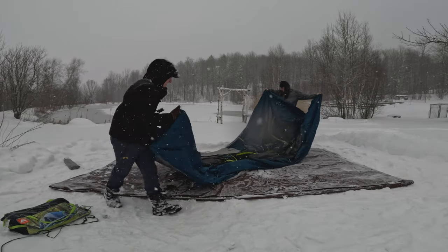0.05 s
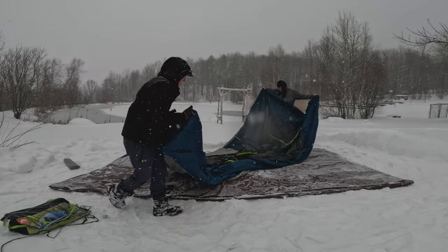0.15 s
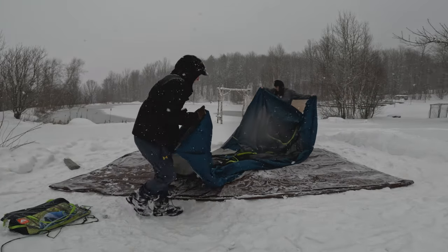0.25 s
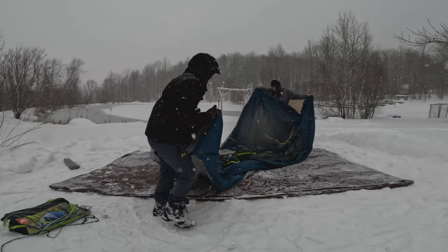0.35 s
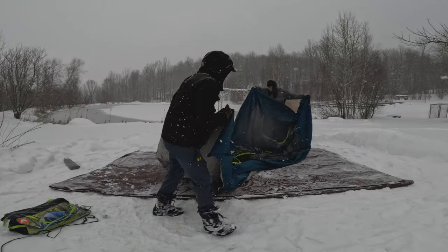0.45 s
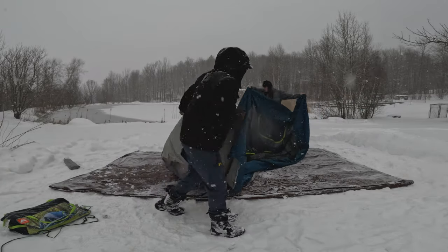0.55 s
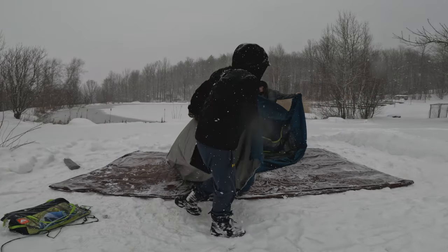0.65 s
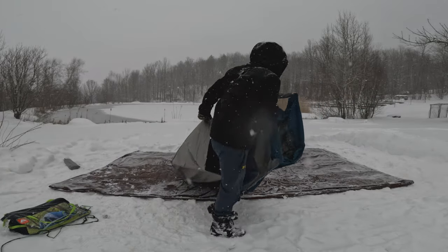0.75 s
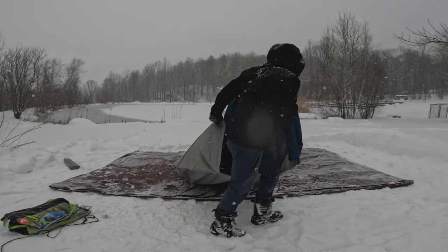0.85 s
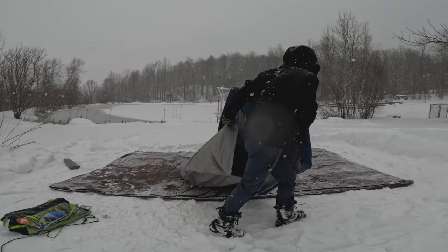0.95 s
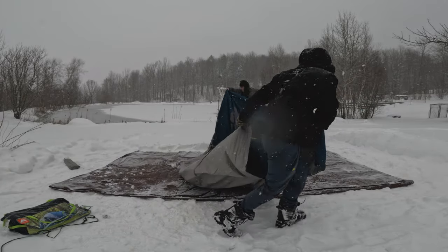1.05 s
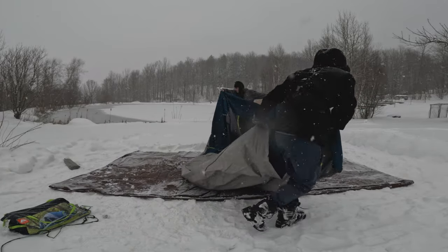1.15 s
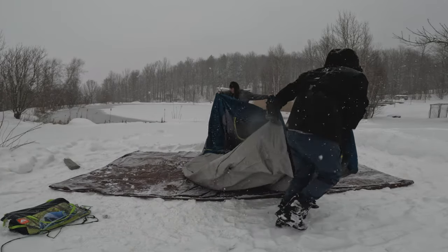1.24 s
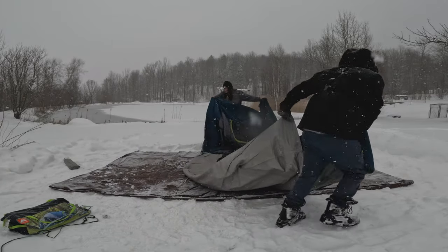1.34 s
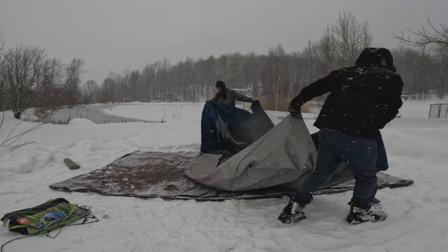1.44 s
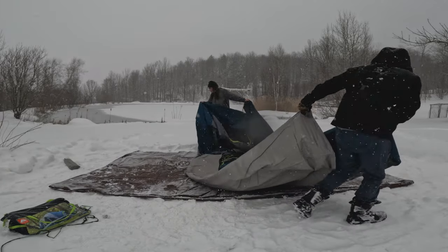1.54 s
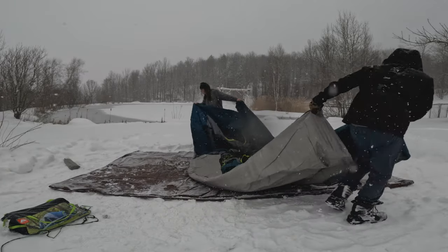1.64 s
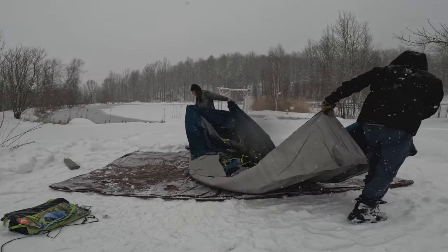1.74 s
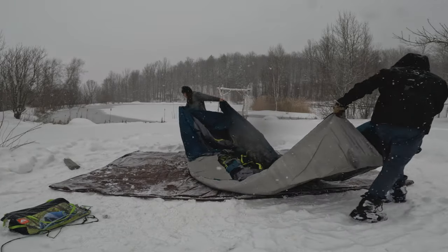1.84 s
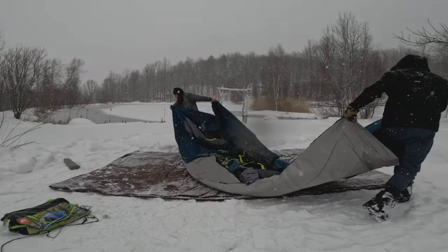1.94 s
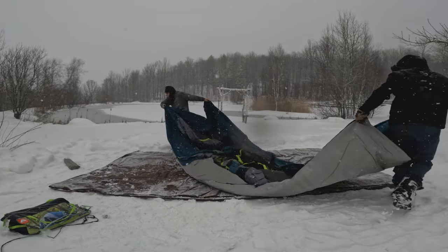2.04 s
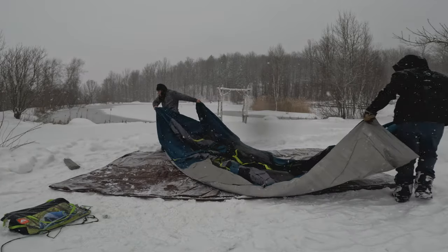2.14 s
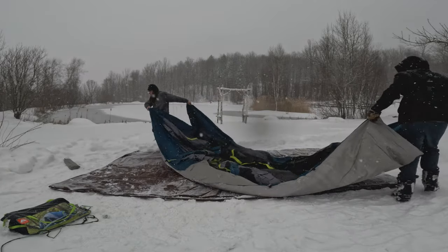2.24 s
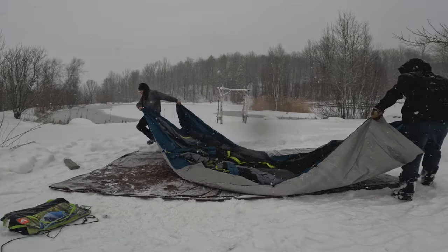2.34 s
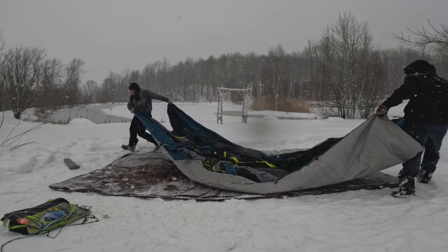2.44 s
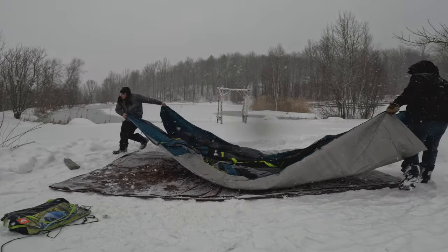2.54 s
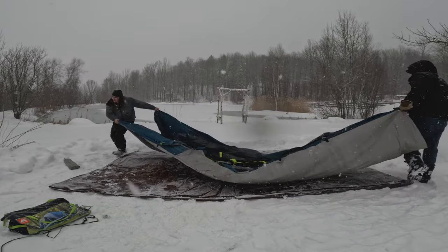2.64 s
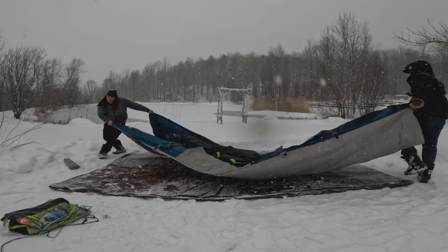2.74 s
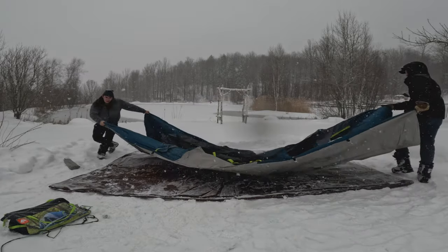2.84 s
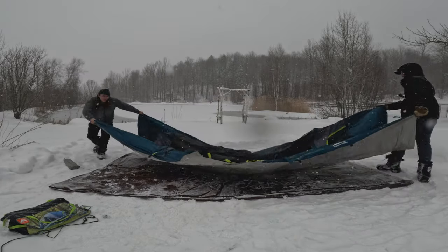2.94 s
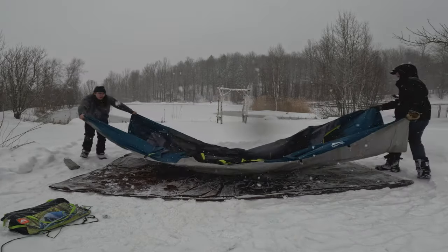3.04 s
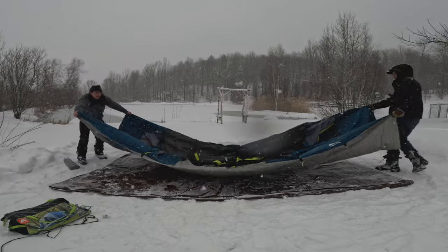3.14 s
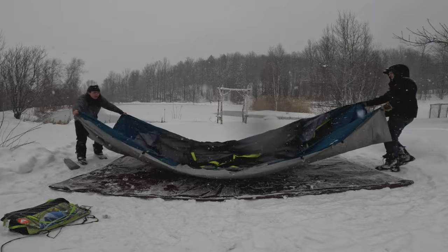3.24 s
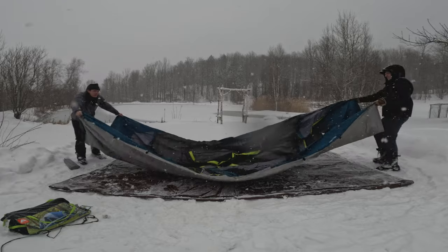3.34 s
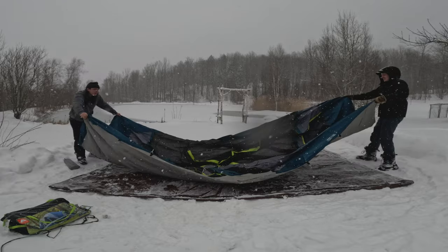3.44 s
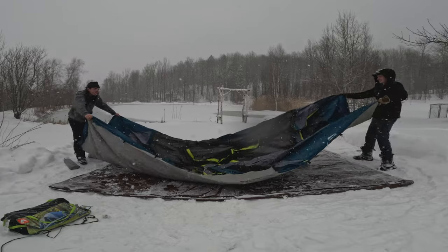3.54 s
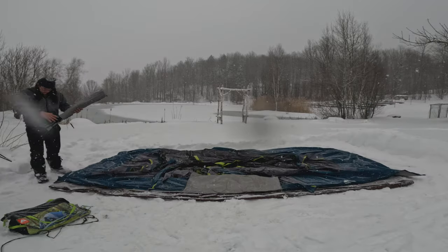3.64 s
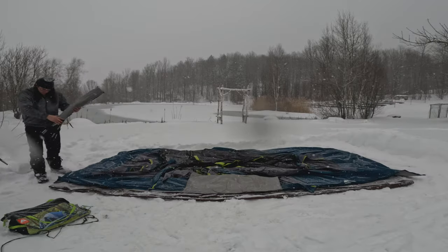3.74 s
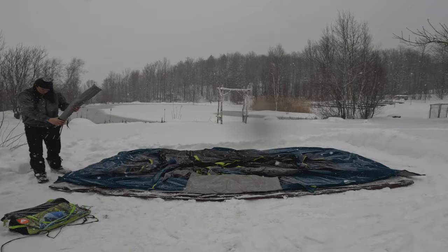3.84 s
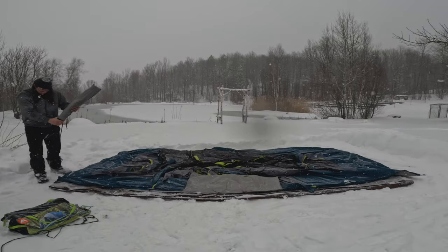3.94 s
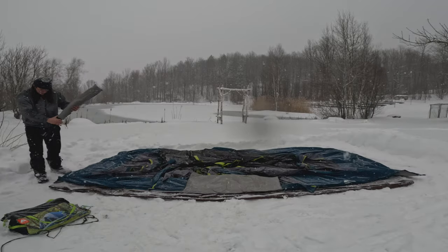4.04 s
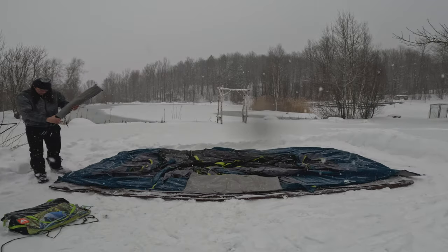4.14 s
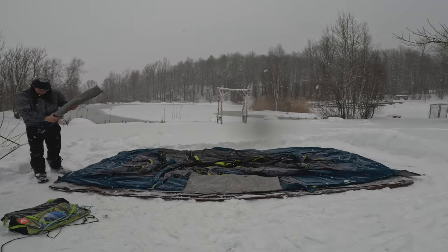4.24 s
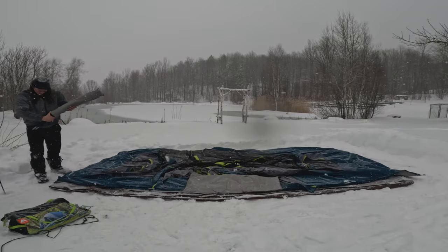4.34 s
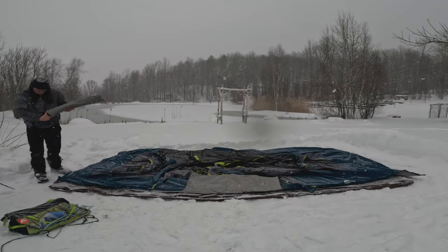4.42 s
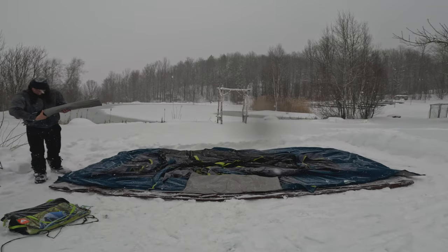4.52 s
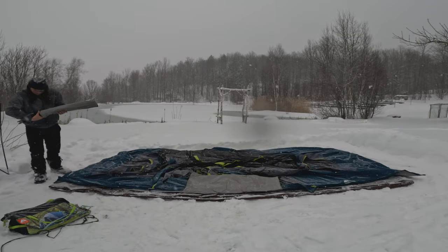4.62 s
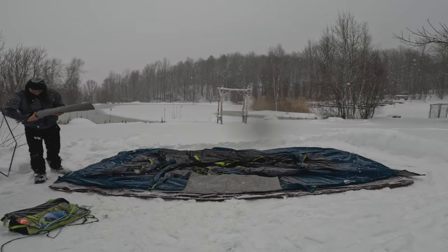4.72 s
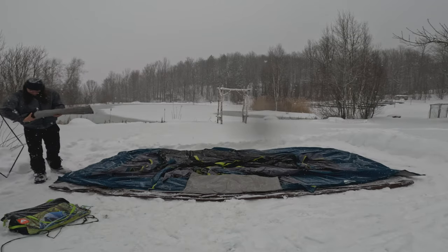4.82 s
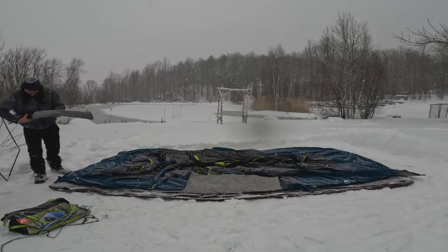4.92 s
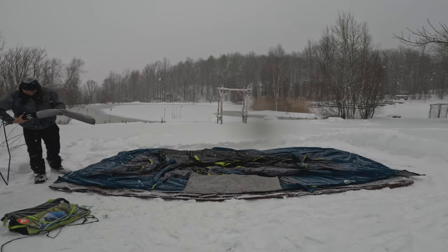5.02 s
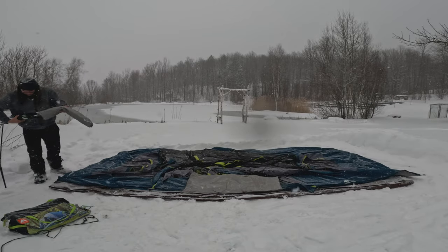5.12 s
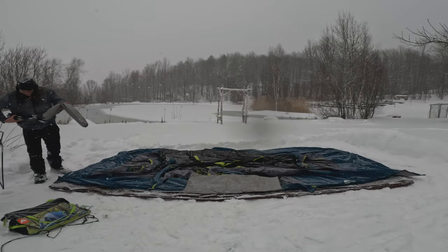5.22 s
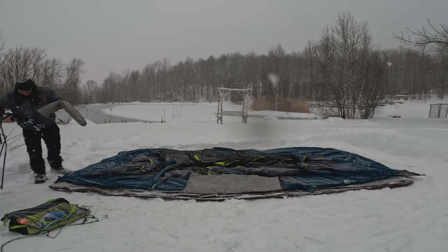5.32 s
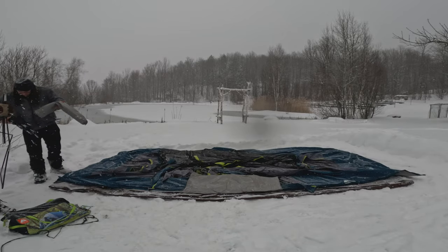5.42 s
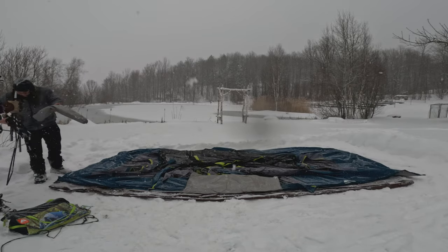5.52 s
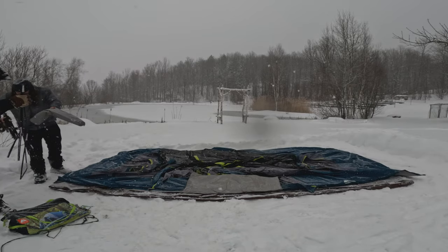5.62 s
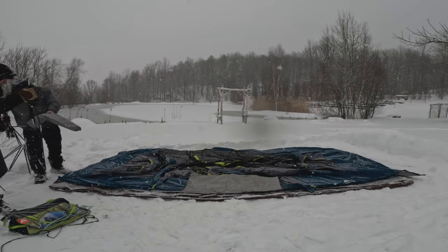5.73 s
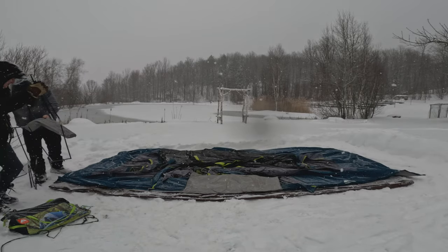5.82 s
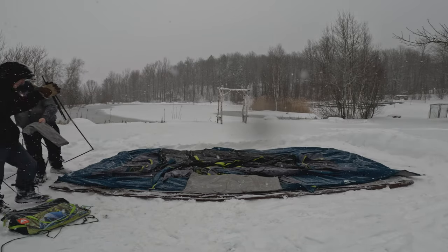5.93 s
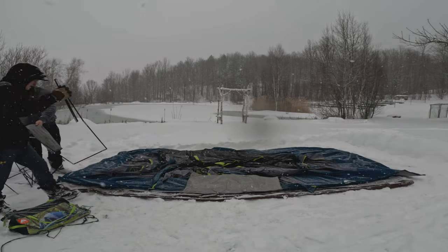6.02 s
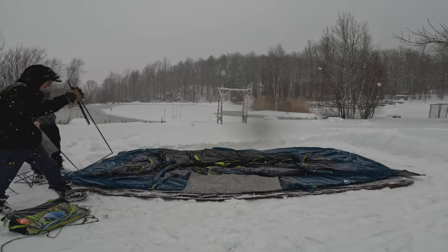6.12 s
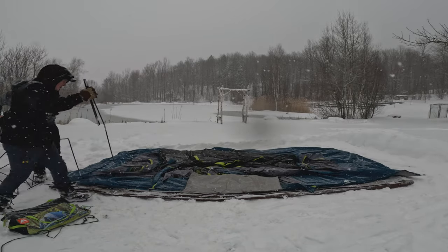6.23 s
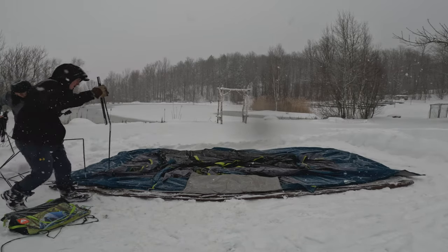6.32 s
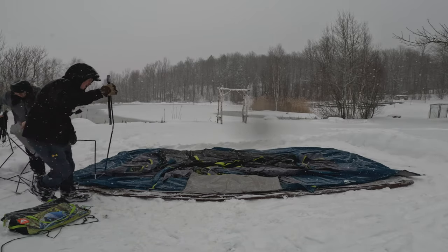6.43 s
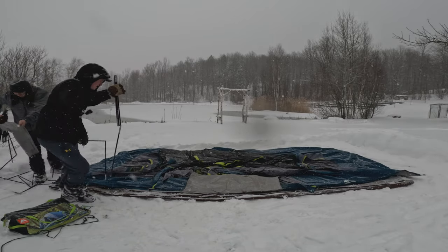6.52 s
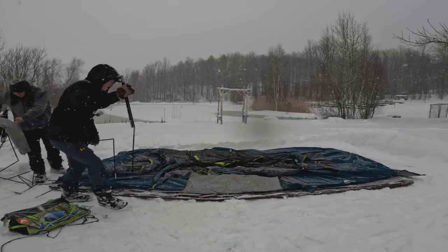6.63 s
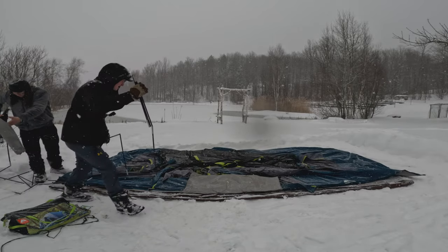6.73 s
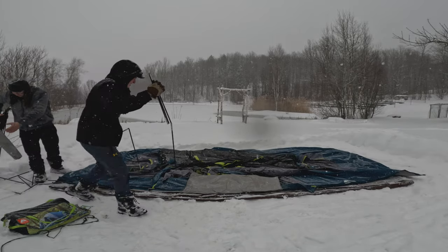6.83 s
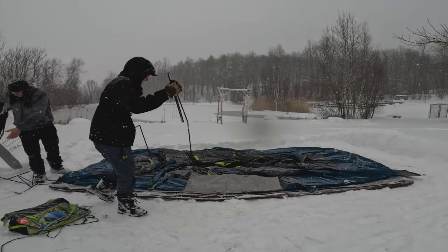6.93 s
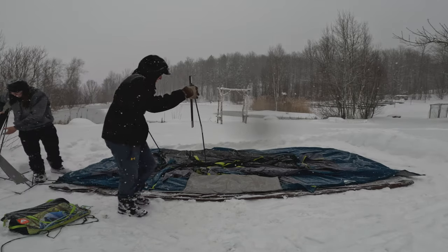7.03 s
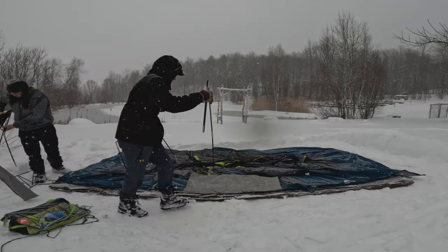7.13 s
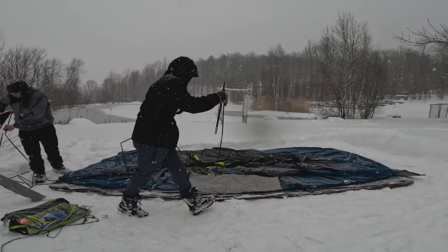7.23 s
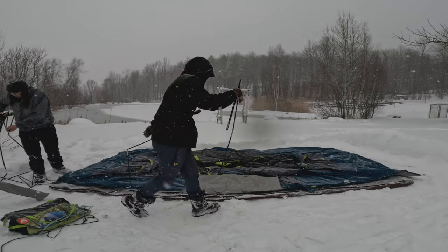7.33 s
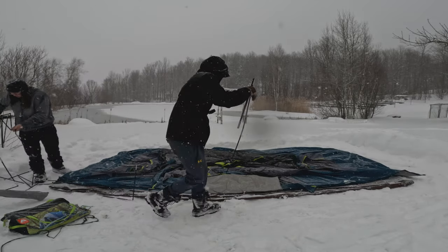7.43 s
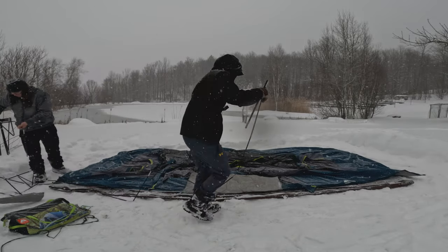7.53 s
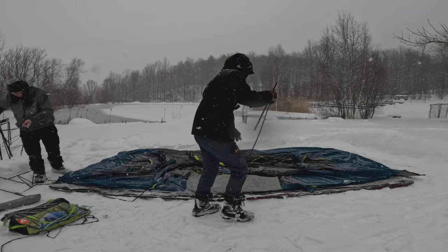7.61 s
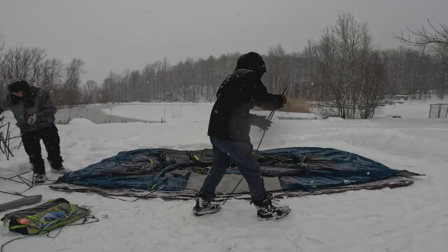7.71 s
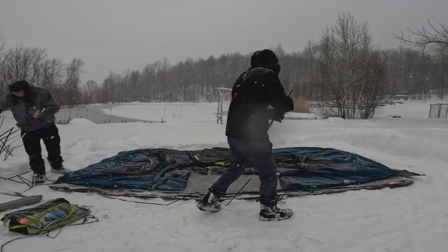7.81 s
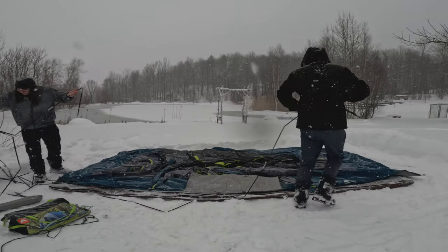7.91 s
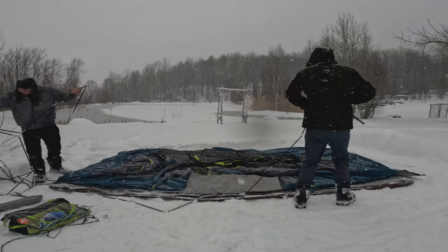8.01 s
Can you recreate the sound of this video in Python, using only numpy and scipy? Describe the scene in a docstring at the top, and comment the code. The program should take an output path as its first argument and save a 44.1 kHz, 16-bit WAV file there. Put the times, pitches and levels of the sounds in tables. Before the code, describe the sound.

Stiff nylon tent cloth hisses and rustles as it is dragged over a tarp on snow, then hollow metal poles click and clatter on the left.

```python
"""Tent and poles in the snow

Two people drag a stiff nylon tent over a tarp on snow, ahead of a small two-port camera microphone: shaped
noise hisses, rustles and drones. Then, to the left, hollow metal poles slide out of their bag, click together
and dangle: uneven impacts ring tube modes. Boots tread the snow as damped low swings with a crunch, a metal
pull jingles on a few high sines, and slow low noise is the cloth flapping and the wind rumbling on the ports."""
import sys
import numpy as np
from scipy import signal
from scipy.fft import rfft, irfft
from scipy.io import wavfile
from scipy.ndimage import uniform_filter1d

SR = 44100
rng = np.random.default_rng(int(sys.argv[2]) if len(sys.argv) > 2 else 0)


def boost(x):
    """Linear amplitude factor 10**(x/20) for a level x in decibels (scalar or array-like)."""
    u = np.asarray(x, float) / 20
    return 10 ** u


def store_pcm(level_fs):
    """Save levels as 16-bit WAV."""
    pcm = np.round(np.clip(level_fs, -1, 1) * 32767).astype(np.int16)
    wavfile.write(sys.argv[1], SR, np.atleast_2d(pcm).T)


N = 355710  # samples
MOVED = 3.62  # s, up to here the work is ahead of the microphone, from here on at its left

# cloth sliding on cloth, first the dragged tent, then the pole bag: t/s, hiss level/dB, drone level/dB
SLIDE = [
    [(0.0, -28.5, -47.5), (0.15, -29, -43.5), (0.5, -22, -46.5), (0.54, -23.5, -49), (0.87, -29.5, -47),
     (1.22, -21, -47.5), (1.34, -22, -41.5), (1.92, -21.5, -45), (2.12, -19, -39.5), (2.44, -21, -39.5),
     (2.66, -28, -44), (3.03, -29.5, -44.5), (3.18, -20.5, -39.5), (3.38, -28, -40), (3.51, -28, -48),
     (3.61, -24.5, -48)],
    [(3.63, -32, -63.5), (3.93, -31, -49), (4.12, -41.5, -64.5), (4.34, -39.5, -70.5), (4.68, -39.5, -60.5),
     (5.15, -23, -42), (5.2, -25, -39), (5.28, -29.5, -54), (5.34, -41, -70), (5.53, -39.5, -85),
     (5.7, -38.5, -52), (5.96, -40.5, -93), (6.06, -41, -79), (6.16, -40, -70), (6.37, -37, -86),
     (6.68, -44.5, -81), (6.99, -41.5, -67), (7.43, -34.5, -67), (7.55, -31, -71), (7.78, -37.5, -67),
     (8.06, -42.5, -86)],
]
RUSTLE_SHARE, RUSTLE_DB = 0.68, -2.5  # folds rustle between hiss and drone: share of the drone 0-1, offset/dB
FIZZ_SLOPE, FIZZ_DB = 0.93, -19  # the fizz follows the hiss: dB per dB, offset/dB
# the flap follows the drone: dB per dB, offset/dB for the tent, offset/dB for the lighter bag
FLAP_SLOPE, FLAP_DB, BAG_FLAP_DB = 0.92, 6, 1


def controls(t):
    """Relative levels in dB of hiss, drone, rustle, fizz and flap at times t: one slide drives them all."""
    hiss_db, drone_db = curves(SLIDE, t)
    rustle_db = RUSTLE_SHARE * drone_db + (1 - RUSTLE_SHARE) * hiss_db + RUSTLE_DB
    fizz_db = FIZZ_SLOPE * hiss_db + FIZZ_DB
    flap_db = FLAP_SLOPE * drone_db + np.where(t > MOVED, BAG_FLAP_DB, FLAP_DB)
    return hiss_db, drone_db, rustle_db, fizz_db, flap_db


# colour of the microphone cavities, on cloth and poles alike: f/Hz, level/dB
PORTS = [(180, -48), (300, -9), (640, -9.5), (950, -6), (2400, -10.5), (4600, -7.5), (5600, -4.5),
         (6450, 0.5), (7100, -7), (8300, -16.5), (10200, -18.5), (12000, -13.5), (13200, -23.5),
         (15300, -45), (16500, -71)]


def cloth(patchy_db=1.1, crackle_db=1.1, ticks_db=2.6):
    """Sliding nylon: dense friction noise with drifting patches and sudden wide-band crackle."""
    hop = 64
    frames, hz = N // hop + 5, np.fft.rfftfreq(256, 1 / SR)
    t = np.arange(frames) * hop / SR
    hiss_db, drone_db, rustle_db, fizz_db, _ = controls(t)
    port_db = read(PORTS, hz)

    # the large sheet carries the lows, small creases the highs
    deep = 1 / (1 + (hz / 950) ** 10)
    low = 1 / (1 + (hz / 2600) ** 4)
    high = 1 / (1 + (8300 / (hz + 1)) ** 16)
    drone = band_gain(port_db, hz, 350, 900) * deep
    rustle = band_gain(port_db, hz, 1050, 2400) * (1 - deep) * low
    hiss = band_gain(port_db, hz, 3500, 6720) * (1 - low) * (1 - high)
    fizz = band_gain(port_db, hz, 8000, 14000) * high
    gain = drone[:, None] * boost(drone_db)
    gain += rustle[:, None] * boost(rustle_db)
    gain += hiss[:, None] * boost(hiss_db)
    gain += fizz[:, None] * boost(fizz_db)

    patches = rng.standard_normal((len(hz), frames))
    patches = uniform_filter1d(patches, size=8, axis=0)
    patches = evened(uniform_filter1d(patches, size=30, axis=1))
    bursts = np.minimum(rng.exponential(1, frames), 4) - 1
    crackle = evened(signal.lfilter([1], [1, -.6], bursts))
    depth_db = np.where(t > MOVED, ticks_db, crackle_db)  # the stiff bag ticks more than the dragged sheet
    gain = gain * boost(patchy_db * patches + depth_db * crackle)
    gain = gain * (hz > 120)[:, None]
    spectra = gain * pair(frames, hop, hz)
    return boost(1.0) * signal.istft(spectra, nperseg=256, noverlap=192)[1][:, :N]


# loud pole clicks: t/s, peak level/dB, brightest ring f/Hz, low knock trim/dB, treble trim/dB
CLICKS = [(3.6244, -13, 6200, -27, -27), (3.6485, -17, 5890, -31, -24), (3.689, -7.5, 6300, -38, -21),
          (3.702, -14, 6560, -30, -25), (3.7194, -2, 5940, -51, -17), (3.775, -1, 6500, -38, -16),
          (3.7864, -11, 6450, -26, -16), (3.8576, -12, 6800, -29, -17), (3.8932, -16, 6070, -28, -23),
          (3.912, -10, 6000, -27, -32), (3.944, -11, 6460, -28, -15), (4.0048, -3, 6600, -34, -9),
          (4.017, -14, 6040, -31, -19), (4.0432, 0, 6560, -33, -18), (4.062, -9.5, 4980, -33, -18),
          (4.117, -12.5, 6240, -34, -26), (4.1345, -14, 5890, -29, -33), (4.3152, -17.5, 6200, -25, -25),
          (4.341, -12.5, 5950, -24, -29), (4.428, -17, 5760, -29, -29), (4.4702, -14.5, 5400, -34, -22),
          (4.5494, -8, 3600, -32, -17), (4.5744, -18, 3460, -27, -27), (4.656, -8.5, 6350, -29, -19),
          (4.7092, -21.5, 6280, -13, -32), (4.7436, -16, 5770, -17, -26), (4.7783, 0, 6100, -43, -34),
          (4.8189, -14, 7580, -38, -10), (5.1374, -3.5, 6400, -28, -22), (5.1744, -6, 6000, -26, -18),
          (5.2859, -5.5, 6500, -28, -19), (5.3026, -10.5, 5900, -16, -24), (5.3175, -11.5, 6560, -25, -22),
          (5.4222, -7.5, 5700, -40, -19.5), (5.5947, -12, 6200, -31, -18), (5.6253, -14, 5800, -32, -15),
          (5.6433, -11, 7250, -32, -25.5), (5.6478, -9, 4570, -24, -18), (5.6732, -15.5, 5600, -31, -14),
          (5.701, -15, 6250, -33, -21), (5.7688, -20, 6080, -37, -23), (5.7945, -24, 5500, -33, -13),
          (5.8202, -19.5, 6350, -31, -21), (5.8661, -5, 4900, -42, -30), (5.9614, -16, 6240, -40, -25),
          (5.9671, -10.5, 6290, -35, -29), (6.0128, -0.5, 5340, -32.5, -23), (6.0552, 0.5, 6400, -46, -21),
          (6.0624, -20, 6270, -29, -23), (6.099, -2, 4550, -36, -28), (6.1252, -3, 4890, -38, -29),
          (6.1464, -8.5, 6400, -36, -19), (6.1542, -12, 6350, -24, -20), (6.2412, -9, 6160, -35, -27),
          (6.2506, -6.5, 5500, -35, -27), (6.2664, -5, 6070, -30, -25), (6.2896, -11.5, 6500, -24, -26),
          (6.3107, -13, 5250, -30, -18), (6.3326, -1, 6800, -32, -19), (6.5523, -24, 5700, -25, -24),
          (6.9256, -2, 6400, -48, -17.5), (7.0013, -13, 4900, -28, -27), (7.0205, -12, 6370, -39, -24),
          (7.035, -24, 4960, -39, -35), (7.057, -20, 5670, -34, -19), (7.0721, -5.5, 4630, -46, -25),
          (7.0935, -1, 4280, -40, -22), (7.1076, 1, 6100, -38, -17.5), (7.128, -18, 6300, -27, -27),
          (7.205, -4.5, 5800, -34, -28), (7.3017, -8, 5700, -17.5, -26), (7.3801, -8.5, 4900, -26, -27),
          (7.3913, -6, 5250, -25, -15), (7.4078, -11, 5440, -27, -25), (7.4408, -5, 5760, -32, -25),
          (7.4724, -1, 6400, -40, -18), (7.4825, -7, 5900, -36, -19), (7.4943, 1, 6200, -43, -22),
          (7.5044, -5, 6300, -41, -24), (7.517, -9, 6270, -27, -19), (7.5333, -5, 5540, -40, -19),
          (7.5503, -11, 4400, -38, -21), (7.5894, -2.5, 5930, -43, -23), (7.6053, -7, 6500, -35, -17),
          (7.616, -6.5, 5570, -32, -20), (7.647, -17, 6460, -23, -18), (7.6647, -4, 6200, -52, -24),
          (7.6846, -32, 6350, -36, -16), (7.7116, -5.5, 6430, -26, -20), (7.7608, -12, 6400, -31, -28),
          (7.7822, -19, 6590, -28, -25), (7.8286, -18, 6060, -32, -15), (7.87, -11, 6500, -47, -28),
          (7.881, 0.5, 6400, -62, -27), (7.9174, -7.5, 6200, -46, -14), (7.9778, -13, 5960, -46, -13),
          (8.001, -9.5, 6300, -37, -19), (8.0486, -18.5, 6270, -25, -26)]
CLICK_T60_S, CLICK_T60_SPREAD = 0.016, 0.6  # typical ring of a click in s, random log spread


def clicks():
    """Pole on pole: a hard tick dies fast into a faint after-rattle."""
    out, t = np.zeros((2, N)), np.arange(4500) / SR
    attack = np.minimum(t / .0004, 1)
    rattle = boost(-12 - 60 * t / .045)
    for s, peak_db, ring_hz, *tone in CLICKS + ticks():
        t60 = CLICK_T60_S * np.exp(CLICK_T60_SPREAD * rng.standard_normal())
        ring = boost(-60 * t / max(t60, .004))
        add(out, s - .0003, boost(peak_db) * struck(attack * (ring + rattle), ring_hz, *tone))
    return out


TICKS_PER_S = 10  # faint ticks of dangling sections
TICK_DB, TICK_SPREAD_DB = 10.5, 4.5  # offset re the hiss of the bag, random spread
TICK_LOW_HZ, TICK_HIGH_HZ = 4000, 6100  # range of the brightest ring
TICK_KNOCK_DB, TICK_TREBLE_DB = -25.5, -19  # trims as for the loud clicks


def ticks():
    """Rows of faint clicks at random moments, louder while the bag is moved."""
    lasts = N / SR - MOVED
    when, size, pitch = rng.random((round(TICKS_PER_S * lasts), 3)).T
    s = MOVED + when * lasts
    peak_db = controls(s)[0] + TICK_DB - TICK_SPREAD_DB * np.log(np.maximum(size, .1))
    ring_hz = TICK_LOW_HZ + pitch * (TICK_HIGH_HZ - TICK_LOW_HZ)
    return [(*row, TICK_KNOCK_DB, TICK_TREBLE_DB) for row in zip(s, peak_db, ring_hz)]


# scrapes of tube, bag and stiff creases:
# t/s, peak level/dB, brightest ring f/Hz, hold/s, low knock trim/dB, treble trim/dB
SCRAPES = [(3.353, -14, 5200, 0.016, -11, -22), (3.69, -20, 5500, 0.023, -24, -27),
           (3.858, -20, 6000, 0.074, -26, -27), (4.011, -7.5, 5400, 0.058, -29, -6),
           (4.552, -13, 3730, 0.034, -31, -21.5), (5.923, -27, 4330, 0.041, -32, -21),
           (5.971, -15.5, 5740, 0.013, -29, -20), (6.02, -15, 4970, 0.023, -30, -17),
           (6.244, -11.5, 5600, 0.012, -35, -19), (6.284, -18, 4000, 0.038, -18, -12),
           (6.331, -3, 3660, 0.02, -31, -26), (7.021, -10.5, 4600, 0.023, -39, -27),
           (7.288, -22, 3470, 0.047, -19.5, -18), (7.475, -10, 4530, 0.064, -33.5, -21),
           (7.716, -16, 4800, 0.031, -17.5, -17), (7.835, -25, 6000, 0.046, -24, -11)]


def scrapes():
    """Sliding contact holds the tube ringing for a while, then lets it die."""
    out, t = np.zeros((2, N)), np.arange(4500) / SR
    for s, peak_db, ring_hz, lasts, *tone in SCRAPES:
        hold = np.minimum(t / .003, 1) * boost(-60 * np.maximum(t - lasts, 0) / .03)
        add(out, s, boost(peak_db) * struck(hold, ring_hz, *tone, dull_db=-11., reach=.7, grit=.3))
    return out


# modes of a pole section: f/Hz, width/Hz, level/dB before random variation
TUBE = [(1620, 45, -2), (2335, 45, 1), (2840, 50, -3), (3250, 40, 2), (3410, 40, 0), (3700, 40, 0),
        (4330, 40, 2), (4850, 50, 0), (5090, 55, -1), (5650, 55, 0), (6120, 55, -3), (6700, 55, 0),
        (7600, 60, -1), (8800, 80, -1)]


def struck(envelope, ring_hz, knock_db, treble_db, dull_db=-9., reach=.5, grit=.7):
    """Uneven impacts under an envelope ring the tube modes near ring_hz, then pass the port cavities."""
    hz = np.fft.rfftfreq(8192, 1 / SR)
    common, stray, size = rng.standard_normal((3, len(envelope)))
    impacts = envelope * np.exp(grit * uniform_filter1d(size, size=9) * 3)
    tube = boost(dull_db) + 1 / (1 + 1j * (hz - ring_hz) / 250)
    for (f, width, db), place in zip(TUBE, rng.standard_normal(len(TUBE))):  # where it is hit sets the mix
        near = np.exp(-(np.log(f / ring_hz) / reach) ** 2)
        tube = tube + boost(db + 4.5 * place) * near / (1 + 1j * (hz - f) / width)
    colour_db = read(PORTS, hz) + 20 * np.log10(abs(tube))
    # knock trims the lows, treble the top; the ring between is left alone
    trim_db = [knock_db + 13.5, knock_db + 11.5, knock_db + 27.5, 0, 0, treble_db + 20.0]
    colour_db += np.interp(hz, [300, 700, 2000, 3000, 7600, 8600], trim_db)
    response = causal(colour_db)
    spectra = [(response * rfft(noise * impacts, 8192))[:, None] for noise in (common, stray)]
    heard = irfft(ports(*spectra, hz, LEFT)[:, :, 0])[:, :5000]
    return heard / abs(heard.mean(0)).max()


# creases snapping and boots landing: t/s, relative level/dB, f/Hz, crunch re push/dB before a common lift
THUDS = [(0.139, -27, 135, -14), (0.6, -18, 121, -36), (0.856, -17.5, 148, -19), (1.352, -19.5, 81, -10.5),
         (1.418, -10, 106, -27), (1.533, -16, 99, -34), (1.793, -13, 103, -38), (2.112, -17, 83, -11),
         (2.439, -20.5, 101, -7.5), (2.528, -28, 116, -29), (2.665, -16.5, 107, -34), (3.864, -43, 153, -8),
         (4.38, -39, 174, -26), (4.842, -47, 81, -5), (5.069, -27.5, 116, -1.5), (5.519, -31, 137, -25),
         (5.546, -24, 136, -45), (5.665, -37, 119, -33), (5.733, -35, 94, -34), (5.979, -17, 117, -37),
         (6.145, -29, 81, -25), (6.243, -18, 106, -41), (6.288, -32, 97, -13), (6.64, -31, 89, -22),
         (6.875, -25.5, 152, -31), (7.205, -20, 132, -20), (7.309, -17.5, 92, -14.5),
         (7.381, -20.5, 92, -24), (7.441, -24.5, 153, -41), (7.714, -19.5, 141, -14),
         (7.827, -22.5, 81, -26)]
THUD_T60_S = 0.053


def thuds():
    """A soft low push: one damped swing and a crunch of packed snow or stiff cloth."""
    out, t = np.zeros((2, N)), np.arange(6000) / SR
    band = signal.butter(2, [250 / SR * 2, 1300 / SR * 2], "band")
    attack = np.minimum(t / 0.0038, 1)
    for s, peak_db, hz, crunch_db in THUDS:
        crunch = evened(signal.lfilter(*band, rng.standard_normal(len(t))))
        push = np.sin(2 * np.pi * hz * t) + boost(crunch_db + 2.5) * crunch
        decay = boost(peak_db + 2.5 - 60 * t / THUD_T60_S)
        add(out, s - .003, decay * attack * push * [[1.05], [.95]])
    return out


# a small metal pull jingles: t/s, relative level/dB, shaken/s
JINGLES = [(2.745, -31.5, 0.037), (3.492, -19, .018), (7.816, -36.5, .045)]
# modes of the pull: f/Hz, level/dB, t60/s
PULL = [(7890, -8, .06), (8050, -11, .05), (11600, -9, .05), (11832, 0, .07), (12165, -2, .07)]


def jingles():
    """The pull rattles for a moment; its few high modes sing, stronger at the left port."""
    out, t = np.zeros((2, N)), np.arange(5000) / SR
    ring = sum(boost(db - 60 * t / t60) * np.sin(2 * np.pi * hz * t) for hz, db, t60 in PULL)
    ring = ring * np.minimum(t / 0.0024, 1)
    for s, db, shaken in JINGLES:
        taps = (rng.random(len(t)) < 250 / SR) * (t < shaken) * 0.46  # 250 taps a second on average
        taps[0] = 1
        add(out, s, boost(db) * signal.fftconvolve(taps, ring)[None] * [[1.4], [.6]])
    return out


# colour of the flapping sheet: f/Hz, relative level/dB per Hz
FLAP = [(26, -39), (45, 2), (97, 0.5), (177, -3.5), (348, -21), (500, -33.5), (650, -32), (1100, -120)]
SETTLE_DB, SETTLE_T60_S = -16.5, 0.4  # rumble re the thud as cloth and snow settle after it


def flap(lumpy_db=3.0):
    """The lumpy low flap of the heavy sheet, swelling after each thud as cloth and snow settle."""
    t = np.arange(N) / SR
    level = boost(controls(t)[-1])[None]
    for s, peak_db, *_ in THUDS:
        add(level, s, boost(peak_db + SETTLE_DB - 60 * t[None, :SR // 2] / SETTLE_T60_S))
    lumps = uniform_filter1d(rng.standard_normal(N), size=900)
    lumps = evened(uniform_filter1d(lumps, size=900))
    return level * boost(lumpy_db * lumps) * rumble(FLAP, 60, 670)


# wind on the ports: t/s, relative level/dB
GUSTS = [(0.0, -42), (1.32, -46), (1.37, -29.5), (2.36, -40), (2.53, -49), (2.99, -55), (3.16, -33),
         (3.86, -40), (3.97, -22), (4.02, -35), (5.0, -42.5), (5.14, -32.5), (6.13, -39.5), (6.15, -33.5),
         (6.69, -31), (6.98, -35.5), (7.14, -29), (8.06, -39)]
# colour of the wind: f/Hz, relative level/dB per Hz
WIND = [(8, 1.5), (18, 2.5), (30, 0), (45, -3.5), (60, -35.5), (90, -57), (300, -38), (500, -87)]


def wind():
    """Slow swings of wind pressure on the microphone ports."""
    level = boost(curves([GUSTS], np.arange(N) / SR)[0])
    return level * rumble(WIND, 20, 55)


def rumble(colour, lo_hz, hi_hz):
    """Low noise of a given colour at both ports, from long overlapping random spectra."""
    frames, hz = N // 1024 + 5, np.fft.rfftfreq(4096, 1 / SR)
    gain = band_gain(read(colour, hz), hz, lo_hz, hi_hz)
    spectra = gain[:, None] * pair(frames, 1024, hz)
    return boost(1.5) * signal.istft(spectra, nperseg=4096, noverlap=3072)[1][:, :N]


# the port pair for a source ahead and for one on the left:
# f/Hz, likeness 0-1, left minus right level/dB, phase by which the left leads/rad
AHEAD = [(60, .98, 1, -.1), (400, .95, 0, -.4), (1000, .96, -1, -.5), (3100, .87, 0, -.7),
         (5200, .93, 0, -.4), (6400, .99, 0, -.1), (7200, .89, 4, 0), (8600, .5, 12, -.4),
         (9600, .52, 10, -1.3), (11500, .58, 8, -.9), (12700, .2, 8, -2.5), (14500, .3, 1, -4)]
LEFT = [(60, 0.97, 0.36, -0.38), (393, 0.68, 0.53, -0.28), (960, 0.92, 2.1, -0.38),
        (3080, 0.79, 5.7, -0.55), (6560, 1, 0.51, 0.32), (7800, 1, 10.5, 1.7), (8700, .6, 17, 0.83),
        (10000, .5, 12, 0.84), (12000, 0.29, 13.6, 0.88), (13400, 0.25, 11, -0.53), (14500, .4, 5, 0)]


def pair(frames, hop, hz):
    """Random short-time spectra at both ports, ahead until MOVED and then on the left."""
    a, b, c, d = rng.standard_normal((frames, len(hz), 4)).T
    common, stray = a + 1j * b, c + 1j * d
    moved = np.arange(frames) * hop / SR > MOVED
    return np.where(moved, ports(common, stray, hz, LEFT), ports(common, stray, hz, AHEAD))


def ports(common, stray, hz, side):
    """Left and right spectra of one source: partly alike, tilted and shifted in phase."""
    f, *columns = np.transpose(side)
    same, tilt_db, lead = (np.interp(hz, f, c)[:, None] for c in columns)
    same = np.clip(same, 0, 1)
    right = (same * common + np.sqrt(1 - same ** 2) * stray) * np.exp(-1j * lead)
    tilt = boost(tilt_db / 2)
    likely_sum = abs(tilt + same * np.exp(-1j * lead) / tilt)  # part of left + right that they share
    return np.array([common * tilt, right / tilt]) * 2 / likely_sum


def evened(x):
    """Scales to unit rms."""
    return x / np.sqrt(np.mean(abs(x) ** 2) + 1e-20)


def read(points, hz):
    """Reads a spectrum on a log-frequency axis."""
    f, value = np.transpose(points)
    return np.interp(np.log(hz + 1), np.log(f + 1), value)


def curves(tables, t):
    """Reads every column of the joined tables at times t."""
    s, *columns = np.concatenate(tables).T
    return [np.interp(t, s, c) for c in columns]


def add(mix, s, sound):
    """Mixes a sound in at second s."""
    part = mix[:, round(s * SR):][:, :sound.shape[1]]
    part += sound[:, :part.shape[1]]


def causal(db):
    """Minimum-phase spectrum for a dB curve, so that a ring follows its impact."""
    log_gain = np.log(boost(np.maximum(np.r_[db, db[-2:0:-1]], -100)))
    return np.exp(np.conj(signal.hilbert(log_gain)))[:len(db)]


def band_gain(db, hz, lo_hz, hi_hz):
    """Gain per bin, scaled so that the band lo-hi holds unit power."""
    gain = boost(db)
    inside = (hz > lo_hz) & (hz < hi_hz)
    return gain / np.sqrt((gain[inside] ** 2).sum())


def scene():
    """Everything that reaches the two ports."""
    return cloth() + clicks() + scrapes() + thuds() + jingles() + flap() + wind()


def roll_off(x):
    """The treble ends steeply here."""
    return signal.sosfilt(signal.butter(12, 16960, fs=SR, output="sos"), x)


def record(dry):
    """Gain control dips just after loud clicks and creeps back; peaks round off."""
    power_db = 10 * np.log10(abs(uniform_filter1d((dry ** 2).mean(0), size=32)) + 1e-12)
    fall = np.arange(N) * 64.0 / SR  # the held level falls by 64 dB a second
    held_db = np.maximum.accumulate(power_db + fall) - fall
    over_db = np.maximum(held_db + 14.5, 0)  # excess over -14.5 dB
    late_db = signal.lfilter([.006], [1, -.994], over_db)
    ducked = dry / boost(0.48 * late_db)
    rounded = .85 * np.tanh(ducked / .85)
    return roll_off(rounded)


dry = scene()
out = record(dry)
store_pcm(out)
```